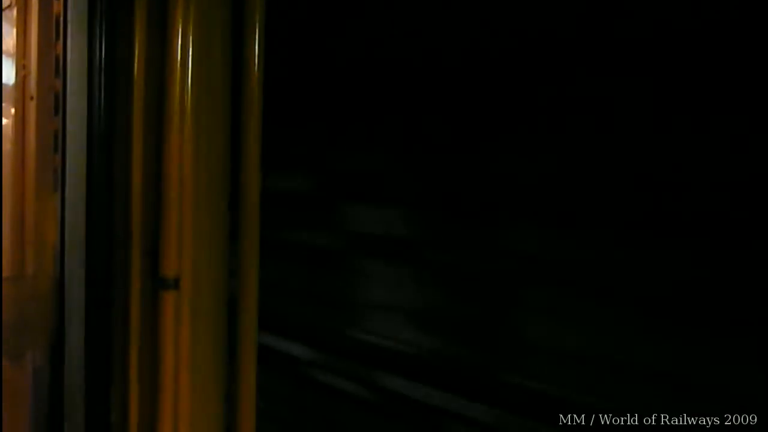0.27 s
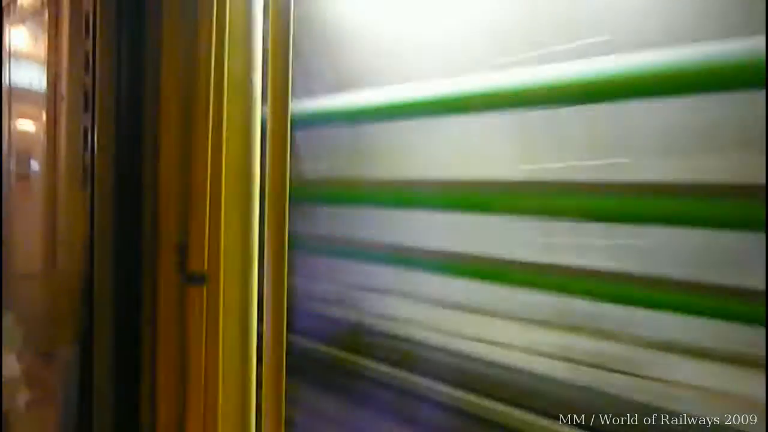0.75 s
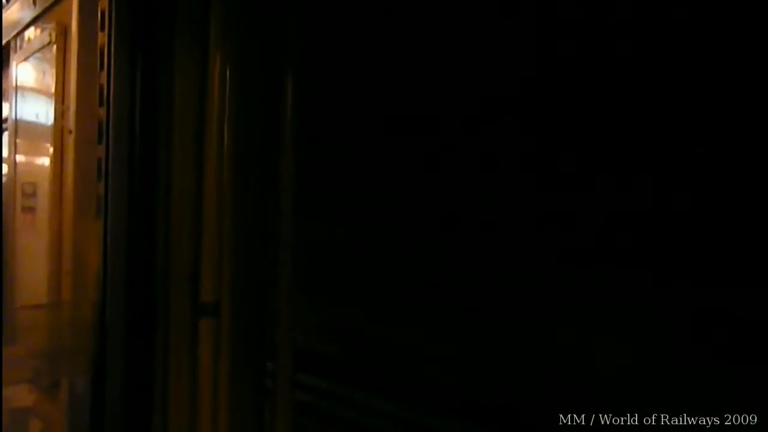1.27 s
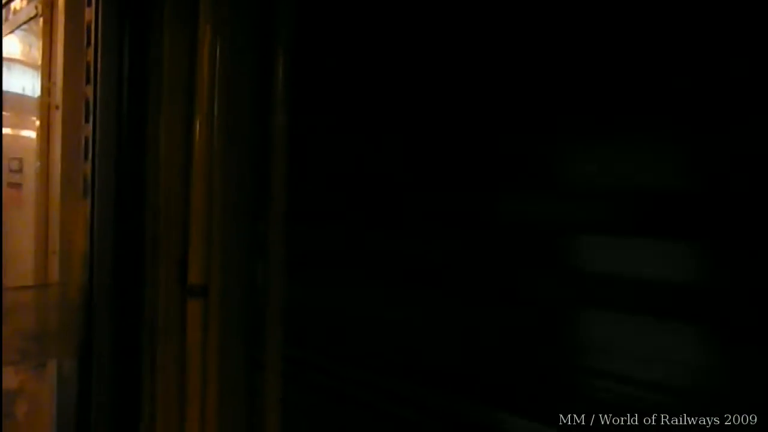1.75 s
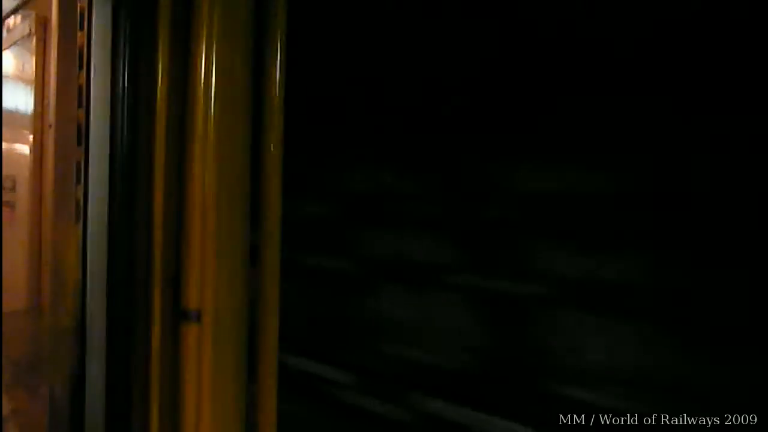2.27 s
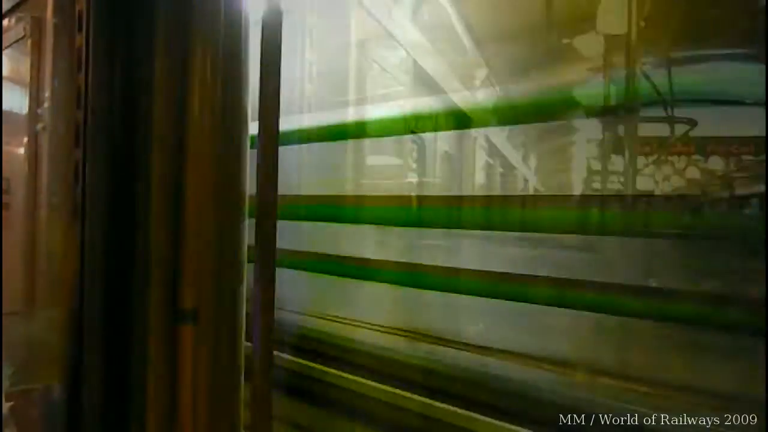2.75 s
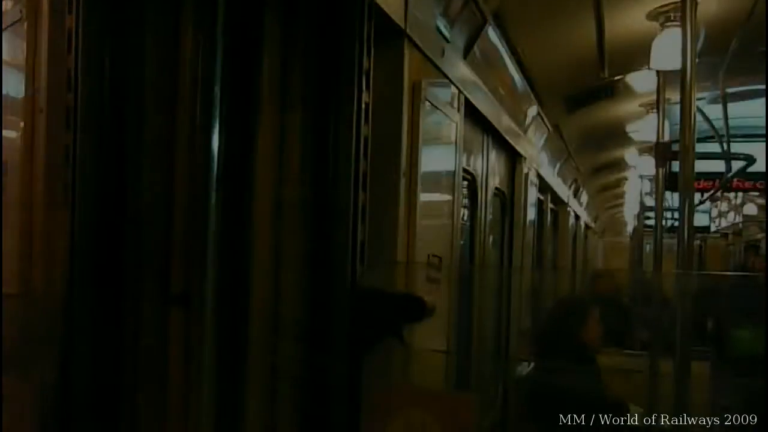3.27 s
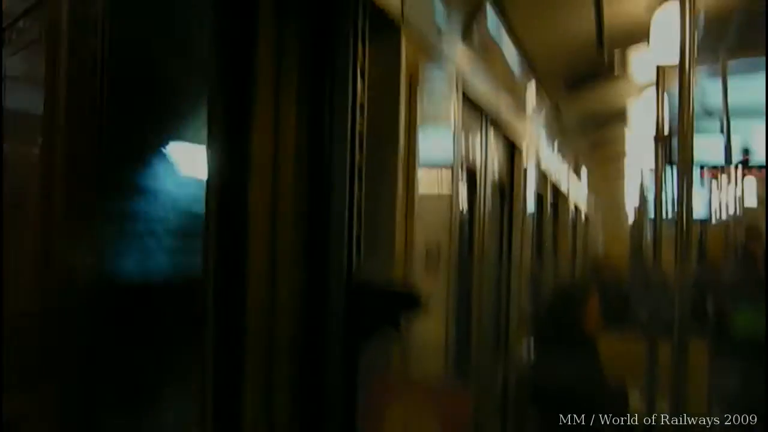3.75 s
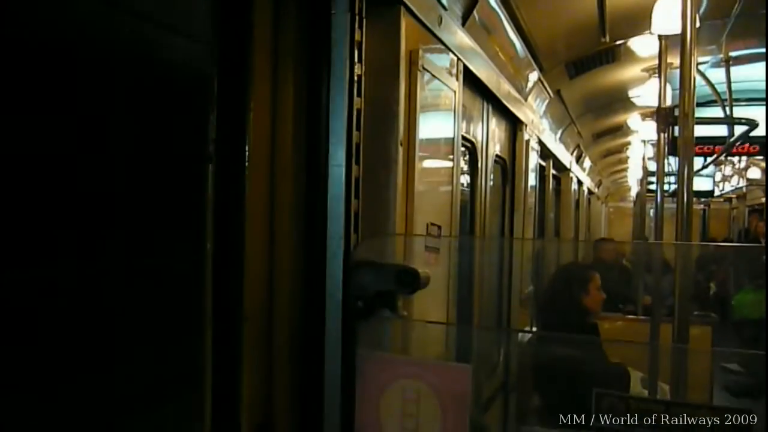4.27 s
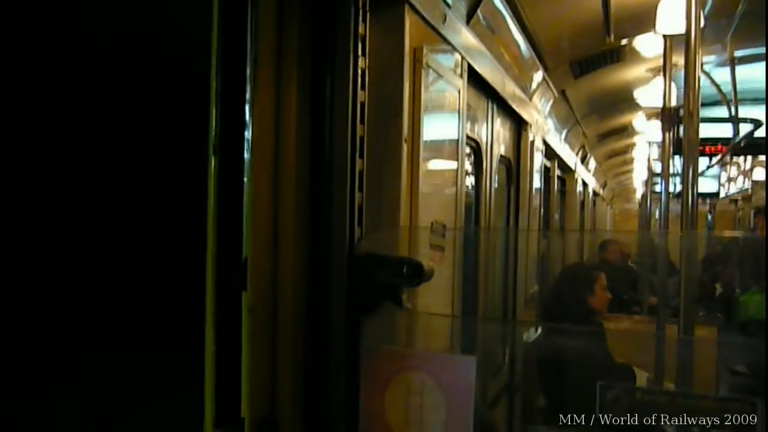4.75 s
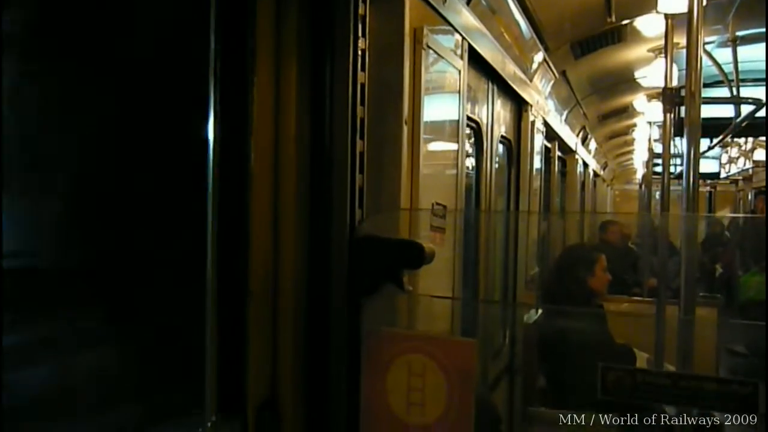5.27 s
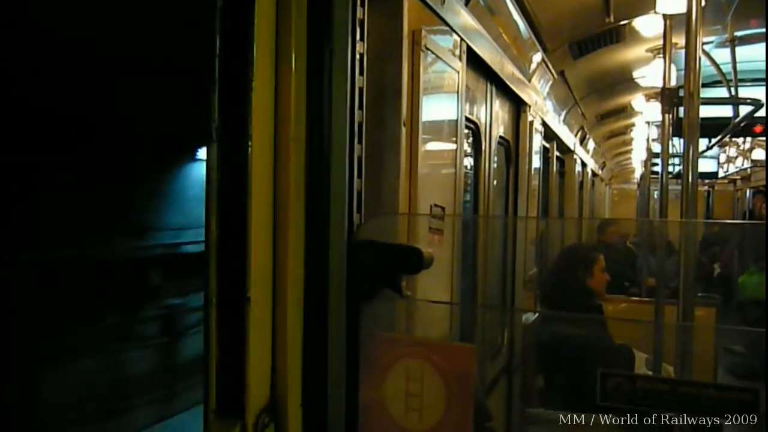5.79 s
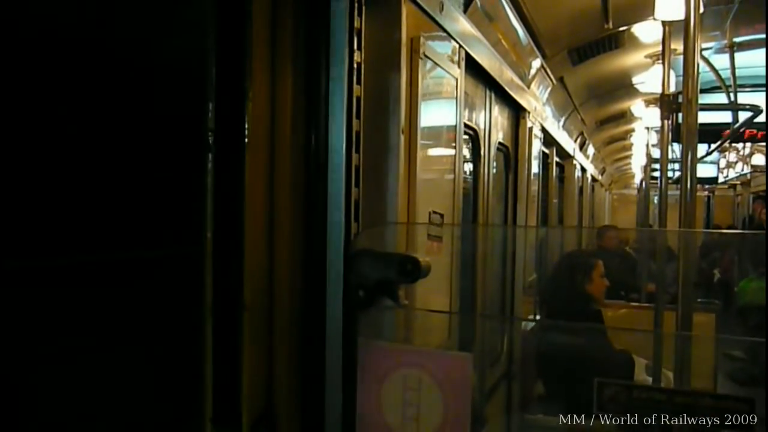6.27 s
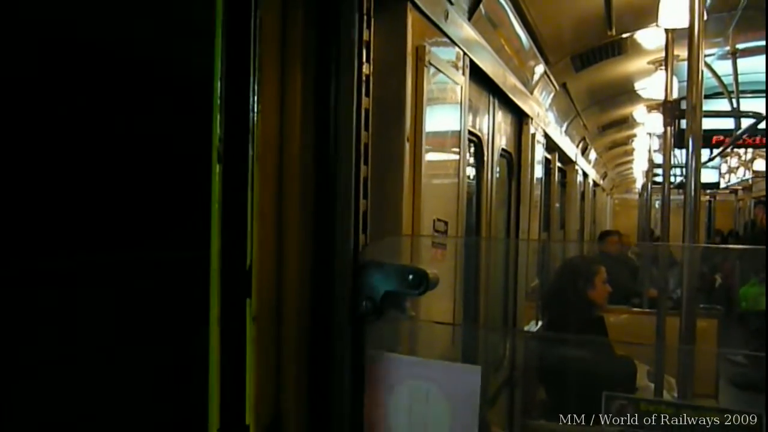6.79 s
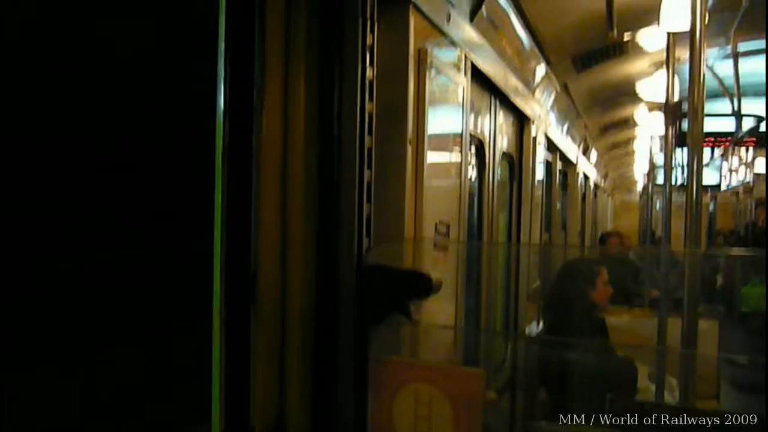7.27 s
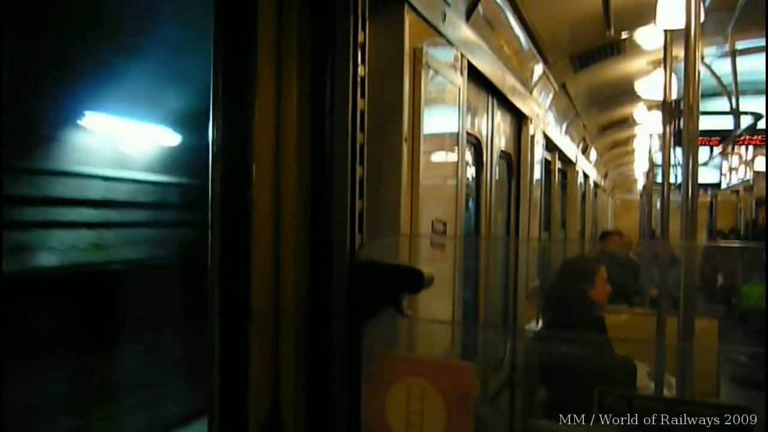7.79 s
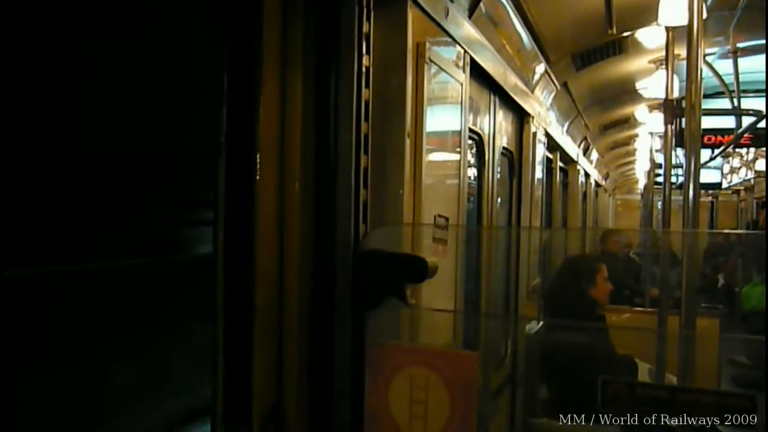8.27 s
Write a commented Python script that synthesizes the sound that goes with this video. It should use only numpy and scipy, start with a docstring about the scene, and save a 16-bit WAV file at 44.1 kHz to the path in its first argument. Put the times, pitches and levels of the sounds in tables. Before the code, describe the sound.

A subway car runs at speed through a tunnel, heard on a small microphone near the door. The body booms and rumbles while the wheels roar and hiss on rough rail. A wheel squeals briefly near the start, and one sharp click follows. Short howls come and go as the door knocks in its frame, hardest near the end. The sound is dull on top.

```python
"""Subway car in a tunnel

Heard at speed by a small camera near the door. The car body rumbles and booms; rough rail makes the wheels roar
and hiss. A flange squeals once, the running gear howls briefly now and then, and the door rattles in its frame.
The camera cuts the treble and adds faint ticks; one sharp click sounds at 2.3 s."""
import sys
import numpy as np
from scipy.fft import rfft, irfft, next_fast_len
from scipy.io import wavfile
from scipy.ndimage import uniform_filter1d, map_coordinates

SR = 44100
rng = np.random.default_rng(int(sys.argv[2]) if len(sys.argv) > 2 else 0)


def put_to_file(sound):
    """Save the sound as 16-bit audio at rate SR, in the file named by the first command-line argument."""
    columns = np.atleast_2d(sound).T  # one column per channel
    safe = np.clip(columns, -1, 1)
    whole_steps = np.round(safe * 32767)
    wavfile.write(sys.argv[1], SR, whole_steps.astype(np.int16))


N = 376173


def amp(db):
    """Decibels to gain."""
    return 10 ** (np.asarray(db) / 20)


def unit(x):
    """x at rms 1."""
    return x / np.sqrt(np.mean(x ** 2) + 1e-20)


def steady(x, span_s=0.077):
    """x held near rms 1 by its smoothed power."""
    width = int(span_s * SR)
    power = uniform_filter1d(uniform_filter1d(x ** 2, width), width)
    return unit(x / np.sqrt(np.abs(power) + 1e-6))


def along(points, hz):
    """(frequency [Hz], value) points read on a log axis."""
    knots_hz, values = np.transpose(points)
    return np.interp(np.log(hz + 1), np.log(knots_hz + 1), values)


def curves(rows):
    """One value per sample for each column after the time."""
    times_s, *columns = np.transpose(rows)
    return [np.interp(np.arange(N) / SR, times_s, column) for column in columns]


def wobble(rate_hz):
    """Smooth random curve, rate_hz knots a second."""
    knots = rng.standard_normal(int(N * rate_hz / SR) + 4)
    return map_coordinates(knots, [np.arange(N) * rate_hz / SR])


def drift(x, depth, rate_hz):
    """x wandering in pitch by the fraction depth."""
    position = np.arange(N) + np.cumsum(depth * wobble(rate_hz))
    return map_coordinates(x, [position], mode="mirror")


def filtered(x, response):
    """x through a gain given as a function of Hz."""
    size = next_fast_len(N + SR // 2)
    return irfft(rfft(x, size) * response(np.fft.rfftfreq(size, 1 / SR)), size)[:N]


def radiated(force, spectrum):
    """Force shaped by its radiator and by the resonances the microphone faces, at rms 1."""
    # microphone aim, window to cabin: (time [s], cabin share [0-1])
    facing = [(0, 0.1), (2.9, 0.1), (4.1, 0.9), (6.2, 0.95), (7.3, 0.9), (8.53, 0.85)]
    # resonances at the window and in the cabin: (centre [Hz], width [Hz], lift [dB])
    window_modes = [(98, 21, -3.5), (172, 15, 4), (248, 63, -3), (313, 110, 2.5), (605, 35, -2.5),
                    (624, 28, 2.5), (713, 35, -3.5), (753, 25, 3.5), (787, 50, 3.5), (1400, 84, 1.5),
                    (1630, 67, 3), (2550, 200, -2.5)]
    cabin_modes = [(193, 33, 2.5), (294, 26, -0.5), (416, 35, 2), (568, 18, -4), (603, 35, 2.5),
                   (642, 24, 4), (660, 31, -1.5), (747, 30, 2), (782, 26, -2), (815, 50, 2),
                   (925, 25, -0.5), (950, 28, 2.5), (994, 23, 3.5), (1310, 61, -4.5), (2000, 180, 3),
                   (2327, 90, 4.5), (2865, 110, 3)]

    def gain(modes, hz):
        lift_db = sum(db / (1 + (2 * (hz - centre) / width) ** 2) for centre, width, db in modes)
        return amp(along(spectrum, hz) + lift_db)

    window = unit(filtered(force, lambda hz: gain(window_modes, hz)))
    cabin = unit(filtered(force, lambda hz: gain(cabin_modes, hz)))
    share = curves(facing)[0]
    return steady((1 - share) * window + share * cabin)


def car_body(rumble_sway_db=2.5, boom_sway_db=1.0, sway_hz=14):
    """Bogies shake the floor and the cabin air booms; each surges as the car jostles."""
    # slow swell along the track: (time [s], rumble [dB], boom [dB])
    swell = [(0, -39, -23), (0.35, -36.5, -20), (0.7, -33.5, -22.5), (1.3, -32, -21.5), (2.1, -34, -23),
             (2.4, -37.5, -21.3), (2.9, -38, -23), (3.4, -36, -21.5), (4.1, -31, -21.5), (4.6, -30, -20.5),
             (5.1, -27.5, -19), (5.45, -31.5, -21.5), (5.9, -26.5, -20.5), (6.5, -29.5, -22.5),
             (6.9, -29.5, -20.5), (7.2, -30.5, -23), (7.9, -27, -21), (8.53, -31, -22)]
    # floor and cabin air spectra: (frequency [Hz], relative density [dB])
    rumble_spectrum = [(10, -24.5), (22, -21), (45, -12), (72, -3.5), (100, 1), (130, 0), (160, -10.5),
                       (260, -49)]
    boom_spectrum = [(90, -40.5), (135, -7), (172, -1.5), (205, -1.5), (262, -2.5), (305, -2), (350, -12.5),
                     (520, -43)]
    rumble_db, boom_db = curves(swell)
    rumble_db += rumble_sway_db * wobble(sway_hz)
    rumble = amp(rumble_db) * radiated(rng.standard_normal(N), rumble_spectrum)
    boom_db += boom_sway_db * wobble(sway_hz)
    boom = amp(boom_db) * radiated(rng.standard_normal(N), boom_spectrum)
    return rumble + boom


def rail_contact(impacts_per_s=130, spread_db=2.0, grit_db=-10.5):
    """Wheel-on-rail force: fine roughness plus tiny impacts."""
    impacts = (rng.random(N) < impacts_per_s / SR) * rng.choice([-1, 1], N)
    strength = amp(spread_db * np.clip(rng.standard_normal(N), -2, 2))
    return rng.standard_normal(N) + amp(grit_db) * unit(impacts * strength)


def rolling(roar_flutter_db=0.62, hiss_flutter_db=0.9, flutter_hz=35, rock_depth_db=0.63, rock_hz=10):
    """Wheels roar and hiss on rough rail, fluttering together as the load shifts and the car rocks."""
    # rougher and smoother stretches of rail: (time [s], roar [dB], hiss [dB])
    stretches = [(0, -19.5, -31.5), (0.7, -19, -32), (2.2, -19.5, -32.5), (3.5, -20, -32),
                 (4.0, -19.5, -32.5), (4.6, -21, -30.5), (5.1, -21, -32), (6.2, -21, -31.5),
                 (6.5, -20, -30.5), (7.4, -20, -31), (7.7, -20, -30), (7.85, -21.5, -32), (8.06, -22, -31),
                 (8.14, -20, -31.2), (8.53, -21.5, -31.5)]
    # rolling noise spectra: (frequency [Hz], relative density [dB])
    roar_spectrum = [(220, -37.5), (340, -0.5), (420, -0.5), (560, -0.5), (790, -2.5), (890, -6.5),
                     (1030, -7), (1200, -13.5), (1450, -23.5), (2400, -51.5)]
    hiss_spectrum = [(900, -29.5), (1300, -1), (1500, -2), (1800, -0.5), (2200, 0.5), (2600, -3),
                     (3000, -3.5), (3300, -4), (4000, -14)]
    roar_db, hiss_db = curves(stretches)
    load = wobble(flutter_hz)
    rock_db = rock_depth_db * wobble(rock_hz)
    force = rail_contact()
    roar = amp(roar_db + rock_db + roar_flutter_db * load) * radiated(force, roar_spectrum)
    hiss = amp(hiss_db + rock_db + hiss_flutter_db * load) * radiated(force, hiss_spectrum)
    return drift(roar + hiss, depth=.005, rate_hz=8)


def flange_squeal(pitch_jitter=.009, shake_db=2.2):
    """A flange rubs the rail: one wheel mode sings, flares, and sags as it lets go."""
    # wheel mode: (time [s], pitch [Hz], level [dB])
    contour = [(0.55, 1775, -58), (0.61, 1775, -40), (0.665, 1775, -37), (0.687, 1778, -28),
               (0.705, 1772, -35), (0.73, 1750, -36), (0.77, 1680, -46), (0.81, 1600, -43),
               (0.84, 1560, -60)]
    hz, db = curves(contour)
    t = np.arange(N) / SR
    rubbing = (t > contour[0][0]) & (t < contour[-1][0])
    phase = 2 * np.pi * np.cumsum(hz * (1 + pitch_jitter * wobble(140))) / SR
    return rubbing * amp(db + shake_db * wobble(110)) * np.sqrt(2) * np.sin(phase)


def gear_howls(pitch_jitter=.022, shake_db=3.5):
    """The rail drives single resonances of the running gear; each swells and sinks back."""
    # howls: (peak time [s], pitch [Hz], level [dB], half length [s])
    howls = [(0.71, 610, -26.5, 0.043), (2.0, 813, -26.5, 0.056), (2.56, 752, -25.5, 0.11),
             (3.03, 495, -23, 0.049), (3.466, 656, -28, 0.049), (3.477, 776, -27.5, 0.056),
             (5.493, 638, -24, 0.033), (5.897, 778, -29, 0.04), (5.98, 1560, -37.5, 0.05),
             (6.33, 781, -28, 0.025), (6.503, 620.5, -26.5, 0.04), (7.018, 720, -24, 0.023),
             (7.154, 603, -26, 0.033), (7.37, 763, -28, 0.025), (7.597, 598, -25, 0.073)]
    t, out = np.arange(N) / SR, np.zeros(N)
    warped_s = np.cumsum(1 + pitch_jitter * wobble(70)) / SR
    for peak_s, hz, db, half_s in howls:
        near = np.abs(t - peak_s) < 3 * half_s
        envelope = amp(db) * np.exp(-((t[near] - peak_s) / half_s) ** 2)
        out[near] += envelope * np.sin(2 * np.pi * (hz * warped_s[near] + rng.random()))
    return np.sqrt(2) * amp(shake_db * wobble(60)) * out


def ring(modes, t, scatter_db=1, detune=0.019):
    """One blow on damped modes, varied at random; alternating signs soften the onset."""
    out = np.zeros(len(t))
    for k, (hz, db, t60_s) in enumerate(modes):
        envelope = amp(db + rng.normal(0, scatter_db) - 60 * t / t60_s)
        detuned_hz = hz * (1 + rng.normal(0, detune))
        out += (-1) ** k * envelope * np.sin(2 * np.pi * detuned_hz * t)
    return out


def door_rattle(thud_lag_s=.0006):
    """Each jolt clacks the catch, then the heavier panel thuds; pitch and decay vary with the spot hit."""
    # knocks in the frame: (time [s], thud [dB], clack [dB], base pitch [Hz], base t60 [s])
    knocks = [(0.7175, -7, -26, 640, 0.018), (1.265, -4, -25, 500, 0.011), (1.873, -3, -29, 520, 0.011),
              (2.9805, -4.5, -34, 720, 0.014), (3.0028, -20, -19, 700, 0.011),
              (3.2265, -3.5, -29, 690, 0.012), (3.3765, -7, -32, 620, 0.011), (3.8655, -7, -30, 660, 0.012),
              (5.4904, -10.5, -28, 650, 0.039), (5.6335, -6, -22, 670, 0.017),
              (5.9982, -3, -30, 750, 0.011), (6.130, -5, -29, 590, 0.024), (6.3365, -10, -30.5, 690, 0.025),
              (6.4672, -10, -11, 700, 0.011), (6.4945, -6, -27, 650, 0.018), (6.797, -18, -20, 700, 0.011),
              (7.226, -10, -24, 890, 0.018), (7.3318, -6, -17, 700, 0.01), (7.6885, -3, -31, 650, 0.018),
              (7.9979, 2, -13, 650, 0.011), (8.0885, -0.5, -13, 660, 0.013),
              (8.2318, -3.5, -19, 520, 0.018), (8.306, -6, -22, 710, 0.0092)]
    # damped panel modes: (frequency [x base pitch], level [dB], t60 [x base t60])
    panel_modes = [(0.69, -7, 0.93), (1, -0.5, 0.89), (1.399, -5, 0.66)]
    # metal catch modes: (frequency [Hz], level [dB], t60 [s])
    catch_modes = [(1550, -8.5, 0.004), (2050, -2, 0.0077), (2480, -3.5, 0.011), (2950, -8.5, 0.0029)]
    out, t = np.zeros(N + SR), np.arange(SR // 10) / SR
    for start_s, thud_db, clack_db, hz, t60_s in knocks:
        modes = [(ratio * hz, db, share * t60_s) for ratio, db, share in panel_modes]
        thud = amp(thud_db) * ring(modes, np.maximum(t - thud_lag_s, 0))
        clack = amp(clack_db) * ring(catch_modes, t)
        out[round(start_s * SR):][:len(t)] += thud + clack
    return out[:N]


def click_and_ticks(click_s=2.3358, click_db=-9.5, t60_s=0.0026, tick_gap_s=.04, scatter_db=4.5):
    """One fast-relaxing step in the signal, then faint, uneven spikes on the camera's regular beat."""
    # ticks build and fade: (time [s], level [dB])
    tick_levels = [(2.4, -64.5), (3.0, -56), (3.8, -55.5), (3.95, -47), (4.2, -45), (4.85, -50.5),
                   (5.2, -59)]
    out, t = np.zeros(N), np.arange(SR // 50) / SR
    out[round(click_s * SR):][:len(t)] += amp(click_db - 60 * t / t60_s)
    times_s, levels_db = np.transpose(tick_levels)
    beats_s = np.arange(click_s + tick_gap_s, times_s[-1], tick_gap_s)
    tick_db = np.interp(beats_s, times_s, levels_db) + scatter_db * rng.standard_normal(len(beats_s))
    out[np.round(beats_s * SR).astype(int)] += amp(tick_db)
    return out


def scene():
    """Mono sum at the microphone."""
    return (car_body() + rolling() + gear_howls() + door_rattle() + flange_squeal())[None]


def record(dry):
    """The camera cuts the treble; a sharp click, the camera's faint ticks and a DC offset are added."""
    # camera low-pass: (frequency [Hz], gain [dB])
    passband = [(3050, 0), (3250, -6.5), (3450, -13), (3600, -22), (3750, -38.5), (3950, -79)]
    top_hz, dc_offset = 15850, -.075
    narrow = filtered(dry[0], lambda hz: amp(along(passband, hz)))
    signal = filtered(narrow + click_and_ticks(), lambda hz: 1 / (1 + (hz / top_hz) ** 120))
    return signal[None] + dc_offset


dry = scene()
out = record(dry)
put_to_file(out)
```